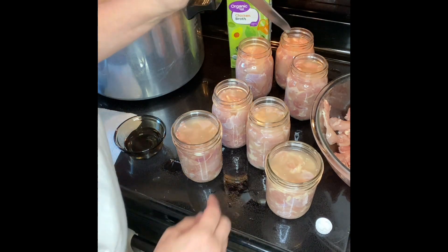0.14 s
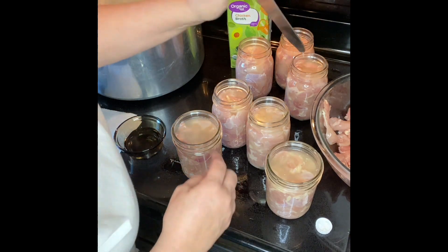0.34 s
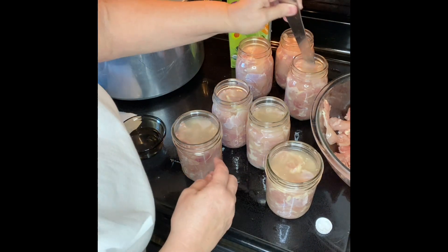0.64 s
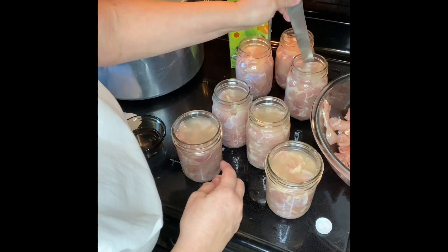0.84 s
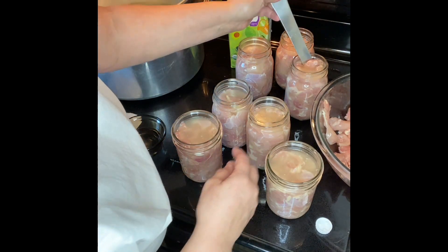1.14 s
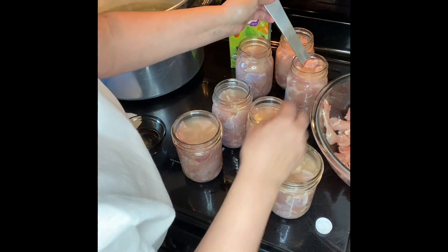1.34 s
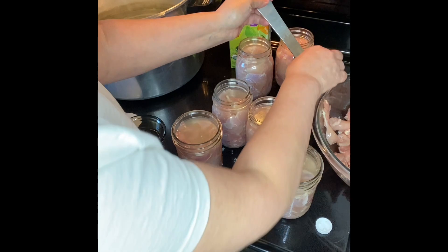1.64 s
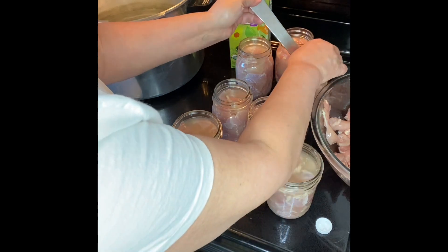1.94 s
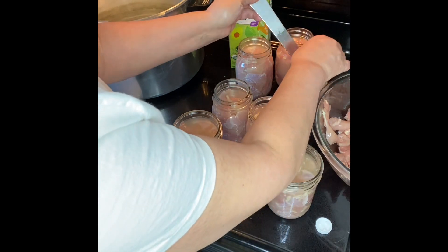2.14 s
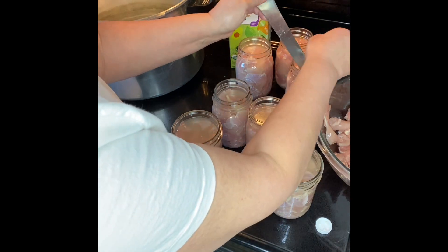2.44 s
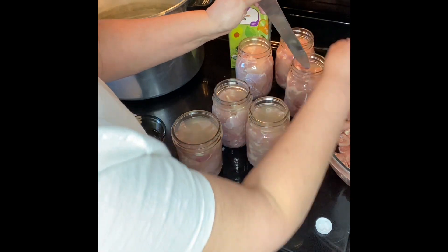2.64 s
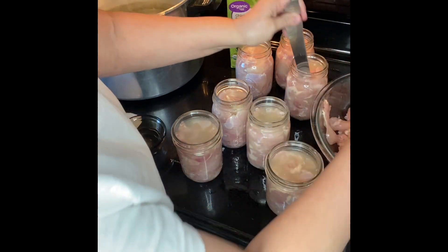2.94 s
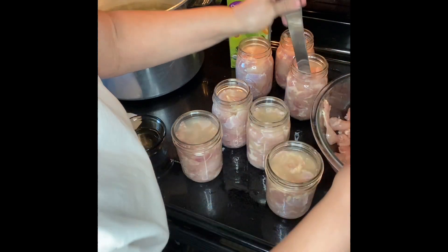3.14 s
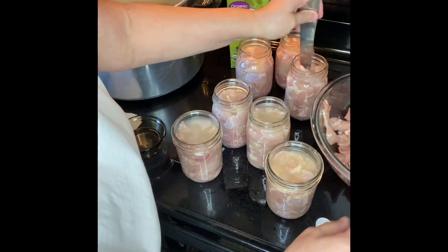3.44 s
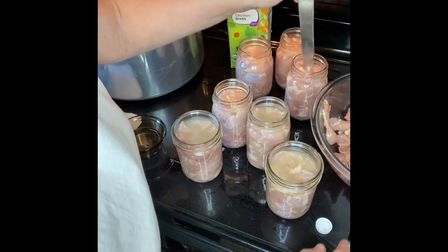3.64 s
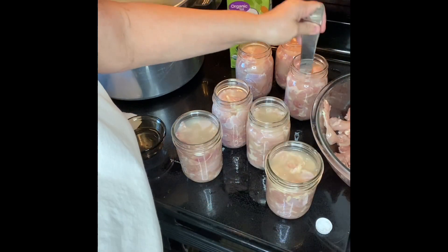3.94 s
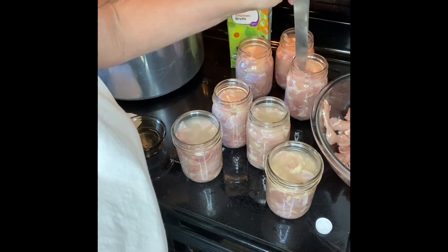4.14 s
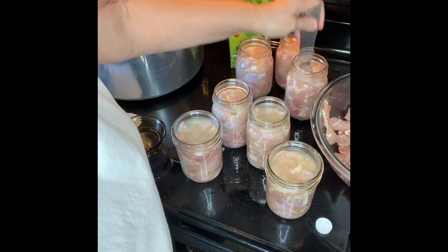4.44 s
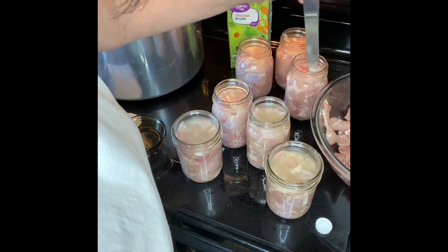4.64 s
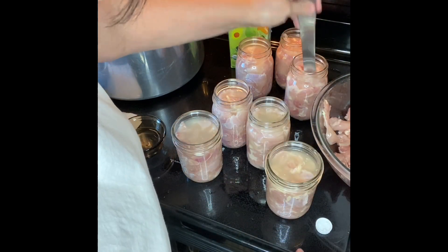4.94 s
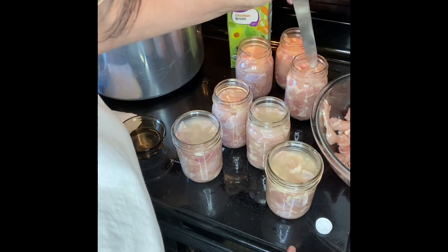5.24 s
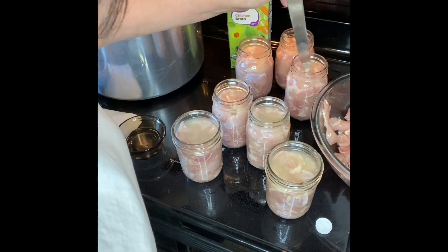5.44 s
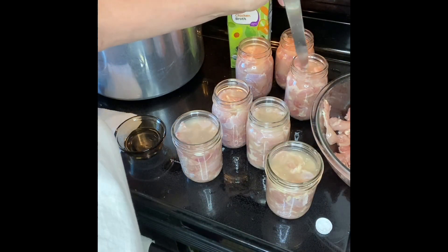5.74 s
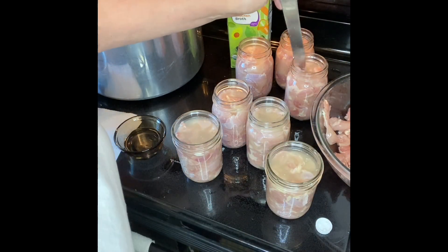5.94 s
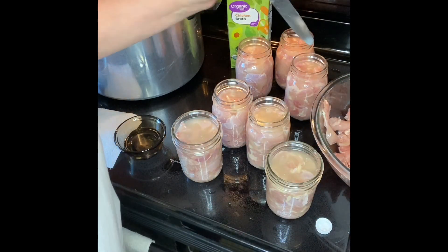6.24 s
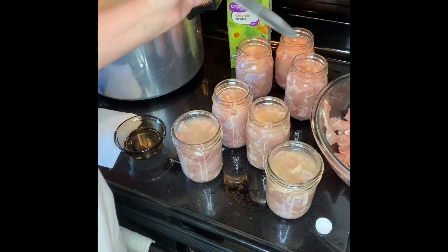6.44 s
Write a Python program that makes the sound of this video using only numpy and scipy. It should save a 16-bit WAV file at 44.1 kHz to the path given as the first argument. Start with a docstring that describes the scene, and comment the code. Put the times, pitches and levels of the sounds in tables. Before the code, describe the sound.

Close, slightly right of centre, metal taps thick filled glass jars: two crisp clinks, then several weaker, duller touches within half a second. Quiet cloth rustle and faint squelches come next, then a soft low knock with sticky clicks. After small moist snaps and a long near-silence, three hollow knocks on the jar and stove build to a firm thump. Small kitchen room, short reflections, steady low air and appliance hum.

```python
"""Blade, chicken and glass jars on a stove

A flat steel blade works raw chicken down into glass jars that stand on a stove top in a quiet kitchen.
Clinks on two rims and knocks on a jar bottom mix noise clatter with decaying sines; knocks also boom.
The meat pops and squelches in filtered noise bursts with short pings, and takes soft, dull bumps.
Swelling noise makes the rubs of sleeve and meat. Each blow has a short room tail over air, hum and hiss."""
import sys
import numpy as np
from scipy import signal
from scipy.fft import rfft, irfft, next_fast_len
from scipy.io import wavfile
from scipy.ndimage import uniform_filter1d

SR = 44100
rng = np.random.default_rng(int(sys.argv[2]) if len(sys.argv) > 2 else 0)


def unload_audio(sound):
    """Save the sound as a 16-bit wav file, at the path given as the first command line argument."""
    columns = np.transpose(np.atleast_2d(sound))
    # keep every value between -1 and 1, then stretch to whole-number steps
    steps = np.round(np.clip(columns, -1, 1) * 32767)
    wavfile.write(sys.argv[1], SR, steps.astype(np.int16))


N = 291188  # length of the scene [samples]
SIZE = 24576  # longest single event [samples]
T = np.arange(SIZE) / SR  # event time [s]

# Blade on a rim: (time [s], contact level [dB], treble tilt [dB/octave], chatter decay setting [s],
# then sends to far jar, near jar, jar neck, blade flat, blade edge [dB])
CLINKS = [(.5255, -24.5, -3.5, 0.14, -26, -47, -51, -59, -56),
          (.5705, -24.5, -2.5, 0.052, -50, -31, -51, -44, -57),
          (.6875, -33, -10.5, 0.047, -68, -50.5, -59.5, -65, -42),
          (.7862, -28, -12.5, 0.025, -51, -75, -61, -31, -74),
          (.8990, -28, -11.5, .06, -62.5, -58, -44.5, -47, -49),
          (.9368, -28.5, -24, 0.05, -70, -50, -52, -41, -46)]
# Blade on the jar bottom: (time [s], blow level [dB], treble tilt [dB/octave],
# then sends to thud, stove top, boom, glass ring, jar foot, against the blow [dB])
KNOCKS = [(2.7995, -25.5, -3, 2.73, -20.5, -31, -29.5, -11),
          (5.4836, -28.5, 1.24, 1.9, -10, -12, -34, -14.5), (5.6720, -23.5, -1, 2.6, -12.5, -20, -29, -16),
          (5.8385, -14, -1.6, 3.2, -14, -19, -30, -26.5)]
# Wet pops in the meat: (time [s], send level [dB], pitch [Hz], crackle decay setting [s],
# bell width [octaves], wide fizz [dB])
POPS = [(1.948, -68.5, 2150, .12, .08, -40), (2.028, -71, 3150, .1, .1, -40),
        (2.3127, -71, 11950, .07, .14, -24), (2.8865, -53, 3480, .14, .17, -18),
        (2.8875, -56, 4150, .16, .14, -20), (2.9075, -58, 8150, .03, .08, -16),
        (2.9235, -63, 7000, .08, .09, -13), (2.9250, -63.5, 4100, .072, .12, -24),
        (3.6677, -75, 13100, .021, .2, -14), (3.8420, -61, 1870, .081, .4, -30),
        (4.0568, -53, 2300, .015, .11, -36), (4.0572, -65, 3700, .015, .12, -24),
        (4.3105, -44, 3950, .04, .08, -25), (4.3115, -46.5, 4330, .025, .06, -22),
        (4.4215, -69, 12900, .012, .3, -14)]
# Soft bumps of arm and meat: (time [s], level [dB], centre [Hz], decay setting [s])
BUMPS = [(1.824, -56, 280, .22), (1.903, -60, 620, .14), (1.942, -58.5, 560, .35), (2.010, -62, 580, .06),
         (2.050, -53.5, 560, .3), (3.759, -57, 175, .3), (4.170, -50, 280, .17)]
# Soft rubs of sleeve and meat: (start [s], length [s], level [dB], centre [Hz], bell width [octaves])
RUBS = [(1.24, 0.48, -77, 9000, 0.38), (1.80, 0.26, -69.5, 744, 0.3), (3.71, 0.26, -69, 1728, 0.31),
        (6.36, 0.12, -71.5, 2133, 0.074)]

# Ringing modes, all as (frequency [Hz], relative level [dB], T60 [s]).
# Two jars and a jar neck:
FAR_JAR = [(1927, -17, .06), (2931, -13, .06), (3090, -14, .05), (3367, -8, .05), (3950, -8, .04),
           (4158, 1, .05), (4306, 4, .05), (4540, -10, .12), (5488, -10, .11), (7305, -.5, .13),
           (8030, -2, .08), (8760, -8, .04), (10070, -14, .11), (10350, -12, .04), (11280, -18, .08),
           (11800, -13, .064), (12870, -13, .04)]
NEAR_JAR = [(1943, -16, .1), (2164, -15, .1), (3321, -8, .06), (4153, 2.5, .07), (4365, -3, .08),
            (4486, -7, .07), (4575, -7, .11), (5450, -8, .1), (6206, -4, .05), (6844, -6, .05),
            (7212, 2, .06), (7299, -3, .085), (8030, -1, .08), (8256, -7, .09), (8896, -1, .05),
            (9200, -3, .065), (9965, 1, .065), (10057, -7, .08), (11250, -9, .05), (12890, -12, .08),
            (14660, -7, .04)]
NECK = [(1270, -9, 0.3), (1380, -0.5, 0.072), (1785, -6, .07), (2150, 2, 0.051), (2410, 3, 0.078),
        (2820, -2, 0.045), (3320, -2, 0.048), (4240, -8.5, .08), (5490, 3, 0.084), (5900, -14, .07),
        (7200, -13.5, .06), (8400, -20, .1), (10950, -14, 0.062)]
# The blade struck flat, and on edge:
BLADE = [(861, -12, .1), (2013, -17, .06), (2382, -13, .05), (2672, -7, .05), (2900, 0, .033),
         (3080, -3, .03), (2914, -10, .14), (3250, -5, .03), (3547, -14, .06), (4201, -10, .08),
         (5927, -7, .045), (7910, -19, .07)]
BLADE_EDGE = [(4200, 2, .08), (5320, -3, .07), (5880, 0, .05), (6015, -9, .11), (7920, 4, .07),
              (9890, -1, .05), (11050, -13, .07), (12840, -11, .05)]
# The full jar, and its foot on the stove:
THUD = [(440, -11, .04), (575, 1.5, .032), (865, 7, .036), (1120, 7, .04), (1330, 0, .028), (1720, 3, .028),
        (1950, 2, .02), (2270, 6, .024), (2530, 3, .026), (2950, -3, .025), (3750, -8, .028)]
FOOT = [(240, -12, .2), (298, -6, .22), (384, 0, .16), (511, -9, .12), (592, -8, .12), (700, -9, .08),
        (899, -6, .11), (1357, -2, .1), (1755, -10, .08), (2929, -17, .14), (3806, -25, .15),
        (5464, -29, .15)]
# The stove top:
STOVE = [(473, -9, .16), (530, -11, .13), (592, -18, .13), (807, -9, .14), (1120, -9, .12),
         (1688, -10, .13), (1762, -11, .08), (1920, -19, .18), (2238, -10, .13), (2514, -15, .13),
         (2665, -7, .14), (2935, -18, .16), (3740, -21, .15)]
# Close modes of the hollow stove, which beat:
BOOM = [(146, -5, .3), (167, 0, .3), (189, -3, .28), (214, -12, .25), (262, -12, .22)]

# Noise colour of steel on glass: (frequency [Hz], relative density [dB per Hz])
CONTACT = [(60, -9.5), (200, -10.5), (600, -10.5), (1400, -15), (2050, -14), (2700, -17), (3400, -2.5),
           (4400, 4.5), (5200, -10.5), (6100, 1), (7400, 2.5), (9300, 0), (12500, -2.5), (15000, -14.5)]
# Noise colour of the jar rattling on the stove: (frequency [Hz], relative density [dB per Hz])
RATTLE = [(60, -30), (140, 3.5), (300, 0), (450, 17), (1150, 4.5), (1450, -9), (2200, 3.5), (3000, -2.5),
          (4100, -7.5), (5600, -19.5), (7400, -17), (10500, -14.5), (13000, -11), (15500, -20)]
# Countless weak modes of the stove top: (frequency [Hz], relative density [dB per Hz])
SHEET = [(100, -11), (300, 7), (550, 5.5), (680, 1), (1200, -1.5), (1500, -2), (1800, -1), (2400, -2),
         (2700, -5.5), (2900, -9.5), (4300, -15), (5200, -27), (15000, -46.5)]
# Tone of the jar under a knock: (frequency [Hz], gain [dB])
KNOCK_TONE = [(450, -3.5), (750, -4), (1150, -3), (1500, 1.5), (2400, -1.5), (3000, -6), (4400, 3.5),
              (8000, -3.5)]
# The meat softens the thud: (frequency [Hz], gain [dB])
CUSHION = [(120, -40.5), (280, -23), (450, 3.5), (2700, -18.5), (5500, -47), (15000, -67.0)]
# Flesh passes little treble: (frequency [Hz], gain [dB])
FLESH = [(2800, 7.0), (5000, -26), (15000, -24)]

# Room tail tone: (frequency [Hz], gain [dB])
ROOM_COLOUR = [(60, -3), (100, 7), (155, 15), (260, 4), (500, -1), (1000, -1), (2300, 5.5), (4000, 7),
               (8000, -1.5), (14000, 0.5)]
# Room tail decay: (frequency [Hz], T60 [s])
ROOM_T60 = [(100, 0.59), (300, 0.43), (800, 0.28), (2300, 0.26), (4500, 0.099), (8000, 0.19), (14000, 0.17)]
# How alike left and right are in diffuse sound: (frequency [Hz], correlation [1])
LIKENESS = [(50, .99), (300, 0.9), (600, 0.64), (900, 0), (1200, 0), (2000, 0), (15000, .15)]
# How late direct sound is on the left: (frequency [Hz], lag [ms])
LEFT_LAG = [(850, 0), (1080, .11), (1500, 0), (1900, .03), (2600, .07), (3500, .07), (4300, .082),
            (15000, .11)]
# Stereo colour of the microphone: (frequency [Hz], left minus right [dB])
BALANCE_DB = [(60, 0), (350, -1.45), (700, -2.5), (1200, 0.5), (2300, 0), (8000, 0.3)]
# Kitchen air: (frequency [Hz], relative density [dB per Hz])
AIR = [(20, -38), (35, -24), (50, -1.5), (66, -15), (90, -7), (135, -5), (290, -4.5), (400, -8),
       (600, -13.5), (1260, -18.5), (1500, -32), (3000, -38), (4300, -38.5), (5400, -58)]
# Microphone hiss: (frequency [Hz], relative density [dB per Hz])
HISS = [(3000, -21), (5400, -8), (6400, -1), (7600, 1.5), (10000, 2.5), (13300, -4), (14300, -11),
        (16000, -18)]
# Appliance tones: (frequency [Hz], rms level [dB])
HUM = [(59.4, -67.5), (285.3, -66), (2923, -95.5)]

AIR_DB, HISS_DB = -59.5, -90  # rms levels before the microphone colour
EDGE_HZ = 15100  # upper band limit
DULL_ABOVE_HZ = 1650  # a glancing touch loses its treble from here up
RING_TILT_SHARE = .35  # the rings follow this share of the tilt of the contact
CLINK_STOVE_DB = -21  # part of a clink that passes down into the stove top
KNOCK_PIVOT_HZ = 508  # the tilt of a knock starts here
SHEET_T60_S, SHEET_RISE_S = .2, 0.0065  # decay setting and rise of the stove-top shimmer
POP_PING_DB, POP_CYCLES = -10, 45  # the pocket rings at its pitch; T60 in cycles
# Faint chance pops: mean level and spread, mean pitch and spread, decay setting, bell width, fizz
SEEP_DB, SEEP_SPREAD_DB, SEEP_HZ, SEEP_OCTAVES, SEEP_T60_S = -77, 1, 2390, 0.27, 0.12
SEEP_WIDTH_OCTAVES, SEEP_FIZZ_DB = 0.12, -50
BUMP_OCTAVES, BUMP_SKIRT_DB = 0.38, -34  # bell width and the flat skirt under it
RUB_SWELL, RUB_GRIT_DB = 0.59, 1.5  # share of a stroke spent swelling; depth of its catches


def clink(db, tilt_db, t60, far_db, near_db, neck_db, blade_db, edge_db):
    """Steel chatters on a rim; the jars, damped by their filling, and the blade ring briefly."""
    attack = onset(rise_s=.0006)
    clatter = burst(t60, peaky_db=6)
    contact = amp(db) * blow(colour(clatter, lambda f: read(CONTACT, f)))
    chatter = in_kitchen(hardness(contact, tilt_db, DULL_ABOVE_HZ) * attack, room_db=-8.0)

    struck = ((far_db, FAR_JAR), (near_db, NEAR_JAR), (neck_db, NECK),
              (blade_db, BLADE), (edge_db, BLADE_EDGE))
    rings = sum(amp(level_db) * ring(modes) for level_db, modes in struck)
    glassy = hardness(rings * attack, RING_TILT_SHARE * tilt_db, DULL_ABOVE_HZ)

    below = stove_top() + amp(-9) * jar_foot()
    return chatter + in_kitchen(glassy, room_db=-13.5) + amp(db + CLINK_STOVE_DB) * below


def knock(db, tilt_db, thud_db, top_db, boom_db, glass_db, foot_db):
    """The full jar thuds and rattles on the stove top; the top rings and the hollow below booms."""
    attack = onset(rise_s=.001)
    thud = amp(thud_db) * colour(blow(ring(THUD) * attack), lambda f: read(CUSHION, f))
    clatter = burst(t60=0.025, peaky_db=-3.0) * attack
    rattle = amp(-9.5) * blow(colour(clatter, lambda f: read(RATTLE, f)))
    touch = burst(t60=0.02, peaky_db=5)
    tick = amp(-33.0) * blow(colour(touch, lambda f: read(CONTACT, f)))
    glass = amp(glass_db) * ring(FAR_JAR)

    jar = colour(thud + rattle + tick + glass, lambda f: read(KNOCK_TONE, f))
    hit = in_kitchen(hardness(jar, tilt_db, KNOCK_PIVOT_HZ), room_db=-12.5)
    boom = amp(boom_db) * ring(BOOM) * onset(rise_s=0.013)  # without a room tail
    return amp(db) * (hit + amp(top_db) * stove_top() + amp(foot_db) * jar_foot() + boom)


def stove_top():
    """The shaken top shimmers with a dense spread of modes; only a few stand out."""
    shimmer = burst(SHEET_T60_S) * onset(SHEET_RISE_S)
    sheet = blow(colour(shimmer, lambda f: read(SHEET, f)))
    tones = amp(-3.0) * ring(STOVE) * onset(rise_s=0.0029)
    return in_kitchen(sheet, room_db=-9.5) + in_kitchen(tones, room_db=-20.0)


def jar_foot():
    """The heavy jar hums briefly where its foot presses on the stove top."""
    return in_kitchen(ring(FOOT) * onset(rise_s=0.0054), room_db=-15) * amp(-5.5)


def pop(db, hz, t60, octaves, fizz_db):
    """An air pocket snaps open between wet pieces of meat and pings; the film around it crackles on."""
    snap = amp(-20.5) * blow(burst(t60=0.0045)) + blow(burst(t60, peaky_db=6.0))
    crackle = amp(-6.0) * blow(colour(snap, lambda f: hump(f, hz, octaves, fizz_db)))
    tone = ring([(hz, 0, POP_CYCLES / hz)]) * onset(rise_s=0.0008)
    ping = amp(POP_PING_DB) * blow(tone)
    return in_kitchen(amp(db) * (crackle + ping), room_db=-11)


def seeping(count):
    """Rows for the faint pops of air that seeps out of the meat at chance moments."""
    times = rng.uniform(0, N / SR, count)
    rows = []
    for s, (loud, high) in zip(times, rng.standard_normal((count, 2))):
        db = SEEP_DB + SEEP_SPREAD_DB * loud
        hz = SEEP_HZ * 2 ** (SEEP_OCTAVES * high)
        rows.append((s, db, hz, SEEP_T60_S, SEEP_WIDTH_OCTAVES, SEEP_FIZZ_DB))
    return rows


def bump(db, hz, t60):
    """A soft, dull push of noise with no ring, its treble soaked up by the flesh."""
    push = colour(burst(t60), lambda f: hump(f, hz, BUMP_OCTAVES, BUMP_SKIRT_DB) + read(FLESH, f))
    return in_kitchen(amp(db) * blow(push), room_db=-7)


def rub(length_s, db, hz, octaves):
    """Soft friction that swells and fades with the stroke, catching every few milliseconds."""
    stroke = np.interp(T / length_s, [0, RUB_SWELL, 1], [0, 1, 0])
    grit = evened(uniform_filter1d(rng.standard_normal(SIZE), size=300))
    catches = evened(amp(RUB_GRIT_DB * grit))
    friction = colour(diffuse(SIZE) * catches, lambda f: hump(f, hz, octaves, skirt_db=-76))
    return amp(db) * stroke * evened(friction)


def in_kitchen(x, room_db, build_s=0.00073, bass_cycles=0.32):
    """Direct sound from a little to the right, plus a room tail whose bass builds up late."""
    hz, t, z = signal.stft(diffuse(SIZE), SR, nperseg=256)
    rise_s = build_s + bass_cycles / (hz[:, None] + 100)
    z = z * fade(read(ROOM_T60, hz)[:, None], t) * (1 - np.exp(-(t / rise_s) ** 2))
    tail = signal.istft(z, SR, nperseg=256)[1][:, :SIZE]
    tail = colour(tail / np.linalg.norm(tail[0]), lambda f: read(ROOM_COLOUR, f))

    hz = np.fft.rfftfreq(2 * SIZE, 1 / SR)
    lag = np.exp(-2j * np.pi * hz * read(LEFT_LAG, hz) / 1000)  # ms to s
    left = irfft(rfft(x, 2 * SIZE) * lag)[:SIZE]
    direct = np.array([left, x])
    return direct + amp(room_db) * signal.fftconvolve(x[None], tail, axes=1)[:, :SIZE]


def room_tone():
    """Moving air and microphone hiss as coloured noise, and appliance tones that waver in phase."""
    size = next_fast_len(N)
    air = amp(AIR_DB) * evened(colour(diffuse(size), lambda f: read(AIR, f)))
    # partly shared by the two microphone ports
    fizz = rng.standard_normal((2, size)) + 0.27 * rng.standard_normal(size)
    hiss = amp(HISS_DB) * evened(colour(fizz, lambda f: read(HISS, f)))
    t, hum = np.arange(N) / SR, 0
    for hz, db in HUM:
        drift = 2.5 * np.cumsum(rng.standard_normal(N)) / np.sqrt(SR)
        hum = hum + amp(db) * np.sqrt(2) * np.sin(2 * np.pi * hz * t + drift)
    return (air + hiss)[:, :N] + hum


def ring(modes):
    """Decaying sines, struck together; neighbouring modes swing in opposite directions."""
    total = 0
    for k, (hz, db, t60) in enumerate(modes):
        total = total + (-1) ** k * amp(db) * fade(t60) * np.sin(2 * np.pi * hz * T)
    return total


def burst(t60, peaky_db=0):
    """A dense clatter that dies away; its many weak modes stand out by peaky_db."""
    x = rng.standard_normal(SIZE)
    for _ in range(2):  # flatten the spectrum of the decaying noise, keeping its phase
        x = irfft(np.exp(1j * np.angle(rfft(x * fade(t60)))))
    grid = np.arange(0, SR / 2, 110)
    chance = np.clip(rng.standard_normal(len(grid)), -1.6, 1.6)
    peaks_db = peaky_db * chance * np.minimum(grid / 3000, 1)  # smoother in the bass
    return colour(x * fade(2 * t60 + 0.17), lambda f: np.interp(f, grid, peaks_db))


def onset(rise_s):
    """A blow takes a moment to spread: an exponential rise."""
    return 1 - np.exp(-T / rise_s)


def hardness(x, tilt_db, pivot_hz):
    """The harder the contact, the brighter: a slope in dB per octave from the pivot up to 8 kHz."""
    return colour(x, lambda f: tilt_db * np.log2(np.clip(f, pivot_hz, 8000) / pivot_hz))


def diffuse(size):
    """Stereo noise from all sides, as alike left to right as LIKENESS says."""
    a, b = rfft(rng.standard_normal((2, size)))
    same = np.clip(read(LIKENESS, np.fft.rfftfreq(size, 1 / SR)), -1, 1)
    mid, side = a * np.sqrt((1 + same) / 2), b * np.sqrt((1 - same) / 2)
    return irfft(np.array([mid + side, mid - side]), size)


def colour(x, curve):
    """Causal (minimum-phase) filter whose gain in dB is curve(Hz)."""
    size = x.shape[-1]
    log_gain = np.log(amp(curve(abs(np.fft.fftfreq(size, 1 / SR)))))
    response = np.exp(np.conj(signal.hilbert(log_gain)))
    return irfft(rfft(x) * response[:size // 2 + 1], size)


def hump(hz, centre_hz, octaves, skirt_db):
    """A bell over a flat skirt, in dB; the bell is down to 1/e at twice the width in octaves."""
    bell = np.exp(-(np.log2((hz + 1) / centre_hz) / octaves / 2) ** 2)
    return 20 * np.log10(bell + amp(skirt_db))


def fade(t60, t=T):
    """Exponential decay by 60 dB in t60 seconds."""
    return np.exp(-np.log(1000) * t / t60)


def amp(db):
    """Decibels to gain."""
    return 10 ** (np.asarray(db) / 20)


def evened(x):
    """Scales to rms 1."""
    return x / np.sqrt(np.mean(x ** 2) + 1e-30)


def blow(x):
    """Scales a transient to the energy of 10 ms at rms 1."""
    return x * np.sqrt(SR / 100 / np.sum(x ** 2))


def read(points, hz):
    """Reads a table on a log-frequency axis."""
    f, value = np.transpose(points)
    return np.interp(np.log(hz + 1), np.log(f + 1), value)


def add(mix, s, sound):
    """Mixes a stereo sound in at time s."""
    part = mix[:, round(s * SR):][:, :sound.shape[1]]
    part += sound[:, :part.shape[1]]


def scene():
    """Every event over the room tone."""
    mix = room_tone()
    layers = ((CLINKS, clink), (KNOCKS, knock), (POPS, pop), (seeping(count=10), pop),
              (BUMPS, bump), (RUBS, rub))
    for table, source in layers:
        for s, *row in table:
            add(mix, s, source(*row))
    return mix


def record(dry):
    """The two microphone ports differ slightly in colour; then the band limit."""
    lean_db = read(BALANCE_DB, np.fft.rfftfreq(N, 1 / SR)) / 2
    ported = irfft(rfft(dry) * amp([lean_db, -lean_db]), N)
    low_pass = signal.firwin(255, EDGE_HZ, window=("kaiser", 9), fs=SR)
    return signal.oaconvolve(ported, low_pass[None], "same")


dry = scene()
out = record(dry)
unload_audio(out)
```